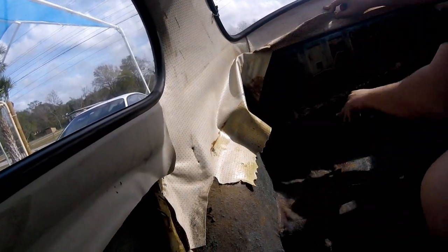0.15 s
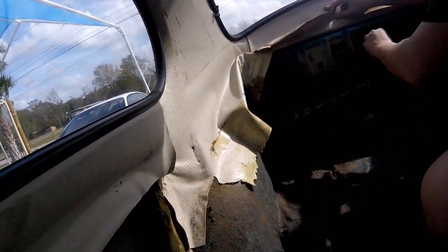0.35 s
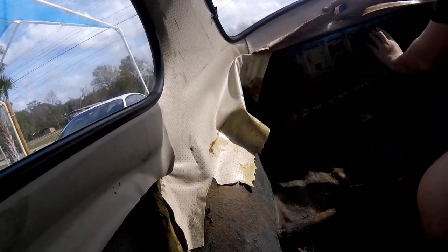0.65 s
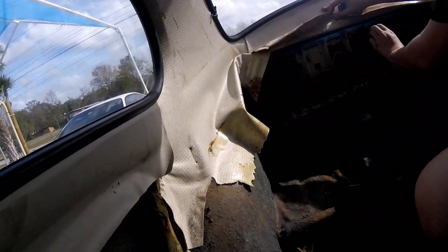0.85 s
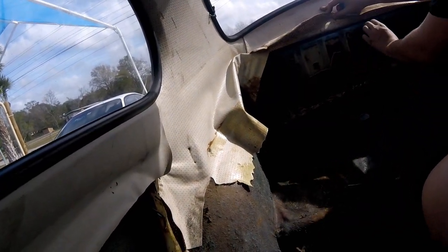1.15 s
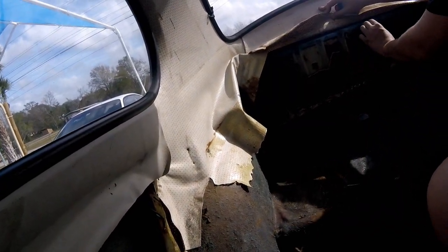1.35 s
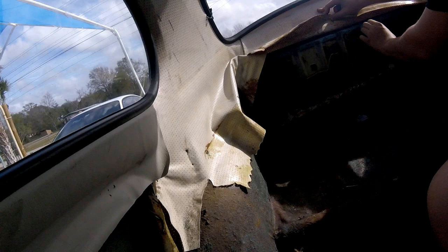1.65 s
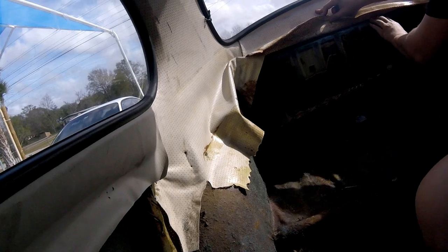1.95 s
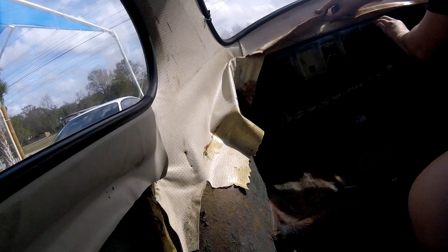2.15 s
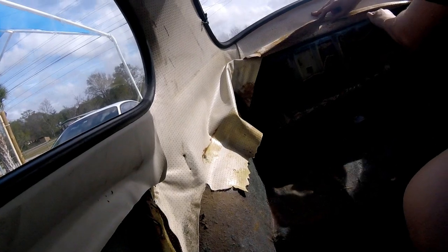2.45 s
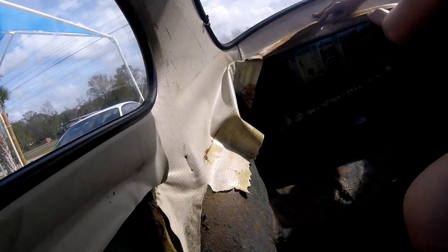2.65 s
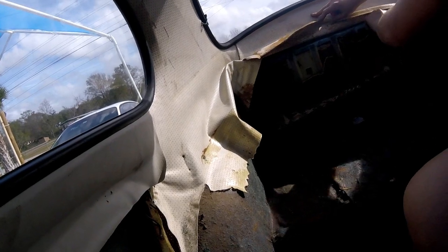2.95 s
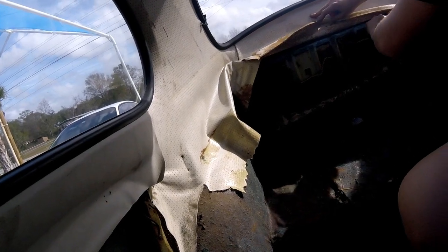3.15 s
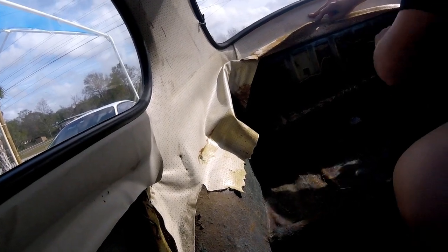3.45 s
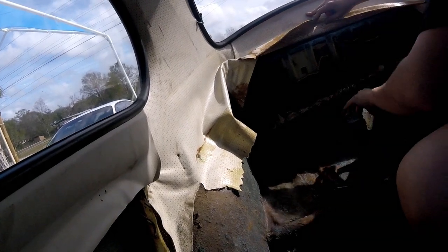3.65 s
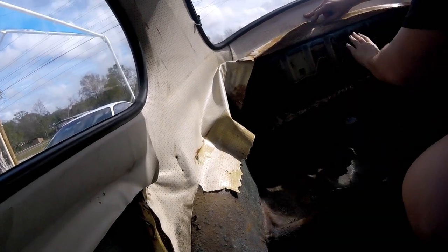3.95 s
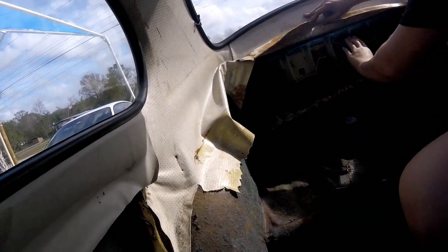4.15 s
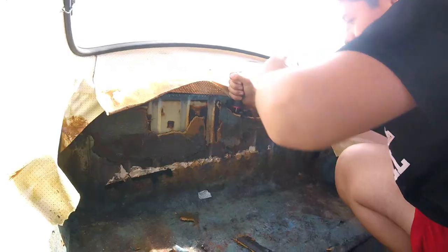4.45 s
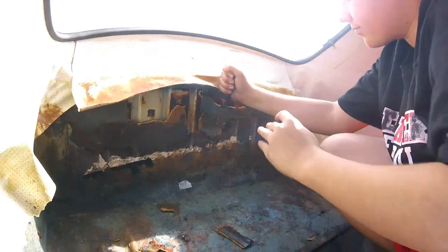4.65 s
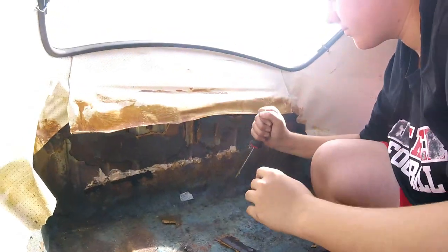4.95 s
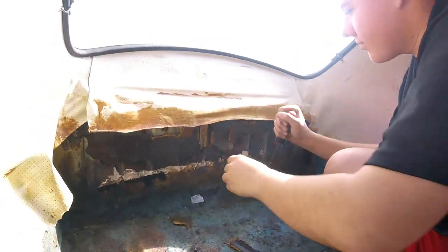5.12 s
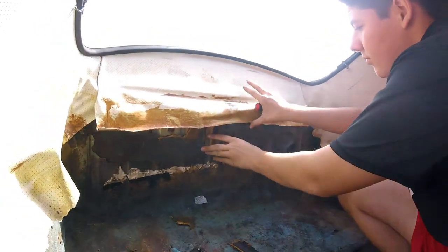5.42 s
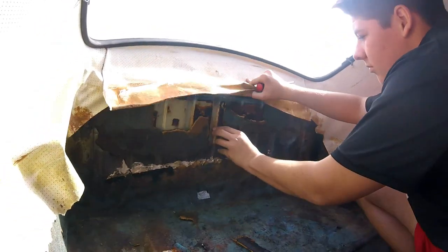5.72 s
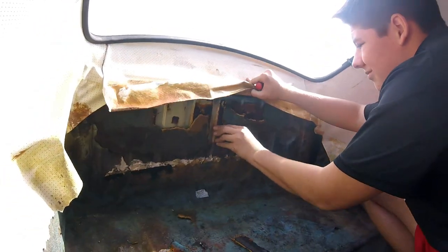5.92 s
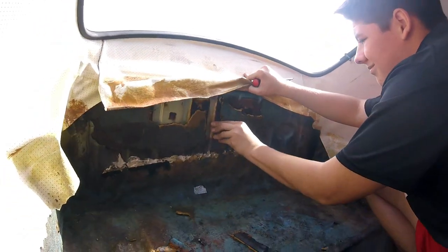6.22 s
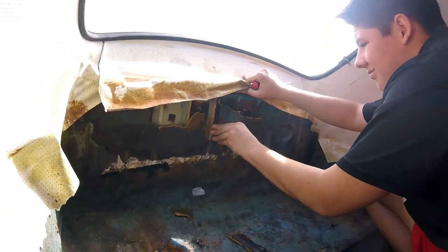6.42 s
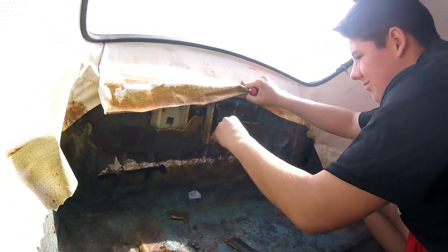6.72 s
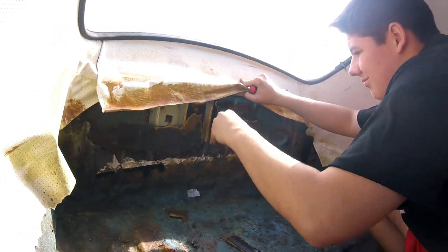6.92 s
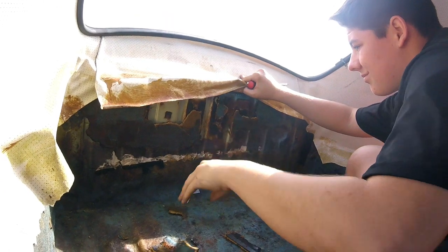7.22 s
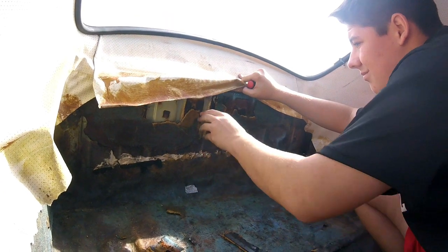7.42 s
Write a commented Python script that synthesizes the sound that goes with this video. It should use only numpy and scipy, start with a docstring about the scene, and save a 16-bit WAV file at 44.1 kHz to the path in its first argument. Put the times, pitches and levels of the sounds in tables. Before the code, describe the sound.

Irregular deep knocks on a hollow car shell mix with dry scraping, brittle glue cracks and a brief, tiny steel tool ring.

```python
"""Old backing is pried and torn off the steel panels inside a stripped car, heard from a small microphone in the cabin.
Glue and fibre snap loose in bursts of tiny cracks, and blows boom as ringing modes of the shell.
The stiff sheet scrapes as gritty noise and rasps once; a steel tool rings twice as fading sine waves.
Behind it, the shell rumbles as low, lumpy noise and a faint hiss runs throughout."""
import sys
import numpy as np
from scipy import signal
from scipy.io import wavfile
from scipy.ndimage import uniform_filter1d

SR = 44100
rng = np.random.default_rng(int(sys.argv[2]) if len(sys.argv) > 2 else 0)


def digitize_waveform(pressure):
    """Quantize a signal to 16-bit integers and store it at the path in sys.argv[1].

    Rows of a 2-D input are taken as channels; values are limited to [-1, 1].
    """
    field = np.atleast_2d(pressure).T
    bounded = np.clip(field, -1, 1)
    quanta = np.round(bounded * 32767).astype(np.int16)
    wavfile.write(sys.argv[1], SR, quanta)


N = 334322  # length in samples

# Spectrum of the steady background hiss: pitch_hz, relative_level_db (per Hz)
AIR_SPECTRUM = [(120, -33.5), (200, -6.5), (600, -4), (2100, -10.5), (3900, -16), (6000, -17), (6500, -9),
                (7000, -17), (9400, -23), (10700, -32), (11900, -28), (16000, -55)]
AIR_DB = -56

# Loudness of the shell as weight shifting in it shakes it: time_s, level_db
RUMBLE_LEVEL = [(0, -43), (2, -42), (2.4, -39), (3.2, -43), (3.4, -34), (3.7, -39.5), (4.42, -36),
                (4.48, -37.5), (5, -40), (7.4, -35), (7.58, -28)]
# Spectrum of that rumble: pitch_hz, relative_level_db (per Hz)
RUMBLE_SPECTRUM = [(12, -49), (20, -17.5), (38, 3), (87, -3), (166, -12.5), (206, -19.5), (400, -25.5),
                   (520, -67), (880, -120)]

# Modes of the steel tool as it rings: start_s, pitch_hz, level_db, undamped_60_db_fade_s
TOOL_MODES = [(2.481, 5010, -30.5, 0.093), (2.483, 5130, -25, 0.026), (2.53, 6940, -26.5, 0.066),
              (2.535, 4995, -38.5, 2.2)]
DAMPED_AFTER_S = 0.047  # a hand or the panel then damps the tool

# One dull, banded rasp as the sheet slides: start_s, end_s, level_db
RASP_STROKE = (4.464, 4.63, -45.5)
# Fixed bands of the sheet that colour the rasp: pitch_hz, relative_level_db
SHEET_BANDS = [(860, -0.5), (1320, 2.5), (2000, 1), (2400, -1), (3120, 1)]

# Strokes of the sheet dragging on steel: start_s, end_s, level_db, tilt_db (crisp above zero, dull below)
SCRAPE_STROKES = [(0.603, 0.716, -46, 2), (0.876, 1.059, -45, -2), (1.145, 1.463, -54, 5),
                  (1.69, 1.83, -53.5, -3), (2.126, 2.223, -54.5, -8.5), (2.242, 2.654, -47.5, 0.5),
                  (2.653, 2.877, -51, -0.5), (2.855, 3.27, -44.5, -1), (3.285, 3.525, -46, 1.8),
                  (3.695, 3.754, -45, 7), (3.769, 3.871, -40, -3), (3.973, 4.382, -55, 0),
                  (4.61, 4.791, -42.5, 0.5), (4.776, 5.12, -51, 8.5), (5.142, 6.106, -59.5, 1),
                  (5.525, 5.603, -54.5, -9), (5.771, 5.812, -48.5, -4), (6.092, 6.367, -46.5, 4),
                  (6.376, 6.928, -47.5, 0.3), (7.206, 7.291, -38, -1), (7.402, 7.55, -50.5, -6)]
SLIPS_PER_S = 43
CRISP_DB, DULL_DB, DULL_PER_TILT = -5, 0.46, 0.72  # dull and crisp parts, against the middle
MOST_CRACKLE, CRACKLE_GROWS_S = 0.64, 0.17  # quick swipes are smooth; long pulls break into slips

# Blows on the shell: start_s, peak_db (before the knock is added), nearest_panel_pitch_hz
SHELL_BLOWS = [(0.181, -5.5, 111), (0.279, -11.5, 117), (0.408, -17.5, 110), (0.918, -28.5, 122),
               (1.758, -31, 79), (2.248, -27, 96), (2.354, -21.5, 91), (2.415, -20, 149),
               (2.558, -30.5, 172), (2.671, -27, 99), (2.891, -25, 99), (3.339, -22.5, 87.5),
               (3.388, -20, 73.4), (3.447, -4.5, 77.4), (3.666, -25, 124), (3.787, -7.5, 102),
               (3.819, -13.5, 80), (4.039, -20, 91), (4.11, -21.5, 77), (4.181, -20, 178),
               (4.466, -19.5, 51), (4.677, -10.5, 94.6), (4.794, -8, 53.4), (4.859, -22, 56),
               (5.35, -27, 50), (5.553, -29, 79), (6.289, -25.5, 90), (6.85, -10.5, 75.6),
               (6.909, -25, 103), (7.212, -4, 121), (7.244, -12.5, 142), (7.449, -22, 164)]
# Modes of the shell before each blow varies them: pitch_hz, relative_level_db, plain_60_db_fade_s
SHELL_MODES = [(47.63, 0.5, 0.42), (59.27, 3, 0.36), (72.7, -4.5, 0.24), (90.96, 1, 0.26), (109, 1.5, 0.21),
               (137.3, -1.5, 0.24), (156.46, 3, 0.37), (185.5, -2, 0.47), (246.2, 5.5, 0.19),
               (297.4, -1, 0.28), (362.3, -2.5, 0.24), (491.3, -8.5, 0.21), (634, -7.5, 0.098),
               (759.5, -7, 0.093), (864, -8.5, 0.12), (1106, -7.5, 0.097)]
# Small, high-pitched panels are stiffer and wake more upper modes
UPPER_DB, UPPER_DB_PER_OCTAVE, PLAIN_PANEL_HZ = -9.5, 12, 100.6
# Hard blows are damped sooner by the hand behind them: fade factor of a 0 dB blow, and its growth per dB below
RING_AT_0_DB, RING_LONGER_PER_DB = 1.028, 0.017

# Glue and fibre snapping loose: start_s, peak_db (of the middle band), crisp_edge_db, freed_patch_pitch_hz
GLUE_SNAPS = [(0.1825, -17, -18, 1300), (0.2818, -32, -6.5, 1420), (0.409, -39, -11, 1390),
              (0.6549, -31, -7, 2500), (0.7362, -39, -7, 4730), (0.9185, -35, -9, 2190),
              (1.3758, -37, 13, 1450), (1.514, -39, -1, 2540), (1.7663, -38.5, -6, 2460),
              (2.3393, -39, 1, 1460), (2.357, -26, -4, 1670), (2.3964, -26, -8, 1410),
              (2.529, -37, -21, 3440), (2.6725, -32.5, 3, 1630), (2.7135, -37, 0, 1390),
              (2.8964, -21.5, -6, 1720), (2.955, -29, 0, 1600), (3.0242, -23.5, -1.5, 1670),
              (3.192, -27, -3, 1720), (3.2353, -35, -2, 5860), (3.4122, -31, -10, 2330),
              (3.6666, -11.5, -23, 2460), (3.771, -29, -2, 2700), (3.7885, -22, -2, 1430),
              (4.029, -32, 1, 3150), (4.1864, -33.5, -10, 1650), (4.5969, -35, 4, 6000),
              (4.6789, -18.5, -4, 2100), (4.791, -23.5, 3, 2400), (4.9072, -28.5, 2.5, 5500),
              (4.993, -28.5, 10, 2840), (5.048, -48, 11, 6300), (5.1002, -32, 15, 2870),
              (6.11, -35, 10, 2540), (6.188, -37.5, -3, 5640), (6.3041, -31.5, 2, 2210),
              (6.3674, -34, 0, 4420), (6.4004, -27.5, -15, 3750), (6.496, -30, 2, 4900),
              (6.558, -33, -4, 1850), (6.642, -43.5, 11, 6450), (6.7815, -31, 0, 1890),
              (6.794, -26.5, 2, 1430), (6.8521, -27.5, -3, 2950), (6.9036, -36, 0, 1610),
              (7.213, -20, -28, 1380), (7.236, -20, -3, 2400), (7.4619, -26, 1, 1830)]
# A snap torn off by a blow knocks the panel too
KNOCK_WITH_BLOW_DB, KNOCK_ALONE_DB, WITH_BLOW_S = 3.5, -9.5, 0.015

# Resonances of the panels that colour snaps and scrapes: pitch_hz, width_hz, boost_db
PANEL_RESONANCES = [(1597, 167, 1.5), (2200, 730, 2), (2560, 200, -0.5), (3360, 1300, -4.5),
                    (4800, 1500, 5.5), (6230, 890, 6)]
# Microphone response to those close sounds: pitch_hz, gain_db
MIC_RESPONSE = [(7000, 1.5), (9500, -10.5), (10500, -19.5), (13000, -29.5), (16000, -31.5)]
EDGE_HZ = 15800  # top of the final band


def amp(db):
    """Turns decibels into a plain multiplier."""
    return 10 ** (np.asarray(db) / 20)


def evened(x):
    """Scales a sound to an average (RMS) level of one."""
    return x / np.sqrt(np.mean(x ** 2) + 1e-20)


def read(points, hz):
    """Reads a curve between its points, along a logarithmic pitch scale."""
    f, value = np.transpose(points)
    return np.interp(np.log(hz + 1), np.log(f + 1), value)


def add(mix, s, sound):
    """Adds a sound to the mix at a time in seconds."""
    part = mix[round(s * SR):][:len(sound)]
    part += sound[:len(part)]


def band(x, lo_hz, hi_hz, order=3):
    """Keeps the part of a sound between two pitches."""
    return signal.sosfilt(signal.butter(order, [lo_hz, hi_hz], "bandpass", fs=SR, output="sos"), x)


def colour(x, gain_db):
    """Filters with a gain given on 1025 bins; phase worked out from the log gain makes it causal."""
    log_gain = np.log(amp(gain_db))
    circle = np.r_[log_gain, log_gain[-2:0:-1]]
    taps = np.fft.ifft(np.exp(np.conj(signal.hilbert(circle)))).real
    return signal.oaconvolve(x, taps)[:len(x)]


def hiss(shape, patchy_db, size):
    """Noise of a given spectrum whose level drifts in patches of time and pitch."""
    hz = np.fft.rfftfreq(size, 1 / SR)
    frames = N * 4 // size + 5
    real, imaginary, patches = rng.standard_normal((3, len(hz), frames))
    patches = uniform_filter1d(patches, size=9, axis=0)
    patches = evened(uniform_filter1d(patches, size=9, axis=1))
    level_db = read(shape, hz)[:, None] + patchy_db * patches
    spectrum = (real + 1j * imaginary) * amp(level_db)
    noise = signal.istft(spectrum, nperseg=size, noverlap=size * 3 // 4)[1]
    return evened(noise[:N])


def three_bands(x, dull, middle, crisp):
    """Splits a broad sound into its dull, middle and crisp parts and weighs each."""
    dull_part = dull * evened(band(x, 330, 1547))
    middle_part = middle * evened(band(x, 1460, 3670))
    crisp_part = crisp * evened(band(x, 6060, 15400))
    return dull_part + middle_part + crisp_part


def air():
    """Faint background hiss: broad noise with small drifting patches."""
    return amp(AIR_DB) * hiss(AIR_SPECTRUM, 2.2, size=512)


def rumble():
    """Weight shifting in the shell shakes it: low noise in slow lumps."""
    s, db = np.transpose(RUMBLE_LEVEL)
    level = amp(np.interp(np.arange(N) / SR, s, db))
    return level * hiss(RUMBLE_SPECTRUM, 2.85, size=4096)


def tool():
    """Modes of hard steel ring as sine waves, cut short when touched."""
    out, t = np.zeros(N), np.arange(5000) / SR
    touched = np.maximum(t - DAMPED_AFTER_S, 0)
    damped_db = -np.minimum(2500 * touched, 16 + 300 * touched)  # a fast drop, then a slower fade
    onset = 1 - np.exp(-t / 0.00057)
    for s, hz, db, fade_s in TOOL_MODES:
        level = amp(db - 60 * t / fade_s + damped_db)
        add(out, s, level * np.sin(2 * np.pi * hz * t) * onset)
    return out


def rasp():
    """Friction noise of the sliding sheet, heard through a few of its fixed bands."""
    start, end, db = RASP_STROKE
    t, out = np.arange(0, end - start, 1 / SR), np.zeros(N)
    grit = rng.standard_normal(len(t))
    bands = np.zeros(len(t))
    for k, (hz, band_db) in enumerate(SHEET_BANDS):
        sign = (-1) ** k  # neighbouring bands take opposite signs
        bands += sign * amp(band_db) * evened(band(grit, hz - 130, hz + 130, order=2))
    fade_in = np.minimum(t / 0.0023, 1)
    fade_out = np.minimum((t[-1] - t) / 0.04, 1)
    add(out, start, amp(db) * evened(bands) * fade_in * fade_out)
    return out


def scrape():
    """Grit dragged on steel: smooth in a rub, or in flurries of small slips that die in the cabin."""
    t = np.arange(N) / SR
    slip_sizes = amp(2.5 * np.minimum(rng.exponential(1, N), 4))
    slips = slip_sizes * (rng.random(N) < SLIPS_PER_S / SR)
    flurries = evened(signal.oaconvolve(slips, amp(-60 * t[:6000] / 0.049))[:N])
    grit = rng.standard_normal(N) * amp(2.0 * np.minimum(rng.exponential(1, N), 5))
    levels = np.zeros((3, N))  # dull, middle, crisp
    for start, end, db, tilt_db in SCRAPE_STROKES:
        shape = np.clip((t - start) / 0.016, 0, 1) * np.clip((end - t) / 0.04, 0, 1)
        crackle = np.clip(MOST_CRACKLE * (1 - np.exp(-(end - start) / CRACKLE_GROWS_S)), 0, 1)
        dull_db = db + DULL_DB - DULL_PER_TILT * tilt_db
        crisp_db = db + CRISP_DB + tilt_db
        parts_db = [[dull_db], [db], [crisp_db]]
        levels += amp(parts_db) * shape * (1 - crackle + crackle * flurries)
    return three_bands(grit, *levels)


def blows():
    """Each blow rings the modes near its panel most; upper modes sound stronger on higher-pitched panels."""
    out, t = np.zeros(N), np.arange(SR // 2) / SR
    mode_hz, mode_db, fade_s = (column[:, None] for column in np.transpose(SHELL_MODES))
    upper = mode_hz > 200
    for s, peak_db, panel_hz in SHELL_BLOWS:
        pitch_chance, level_chance, phase_chance, beat_chance = rng.standard_normal((4, len(SHELL_MODES), 1))
        upper_db = UPPER_DB + UPPER_DB_PER_OCTAVE * np.log2(panel_hz / PLAIN_PANEL_HZ)
        ring = RING_AT_0_DB - RING_LONGER_PER_DB * peak_db
        hz = mode_hz * (1 + 0.0345 * pitch_chance)  # each blow's modes vary a little in pitch by chance
        near = 1 / (1 + (np.log2(hz / panel_hz) / 0.42) ** 2) + 0.054

        life = t / (fade_s * ring)
        fall = amp(-60 * life) + 0.88 * amp(-200 * life)  # a strong first swing, then the ring
        swing = -np.sin(2 * np.pi * (hz * t + 0.13 * phase_chance))
        modes = amp(mode_db + 2.22 * level_chance) * fall * swing
        # close neighbours beat with each mode
        beat_hz = 0.0585 * (1 + abs(beat_chance)) * hz
        modes *= 1 + 0.63 * np.cos(2 * np.pi * beat_hz * t)
        # low-pitched panels start more slowly and wake fewer upper modes
        onset_s = 0.0021 * amp(-0.7 * upper_db)
        onset = 1 - np.exp(-t / onset_s)
        modes *= onset ** 2

        boom = (modes * near * ~upper).sum(0)
        knock = (modes * upper).sum(0)
        rattle = evened(band(rng.standard_normal(len(t)), 160, 818))
        rattle *= amp(-60 * t / (0.15 * ring)) * onset
        knock = knock / abs(knock).max() + 0.31 * rattle  # loose trim shakes with the panel
        add(out, s, amp(peak_db) * (boom / abs(boom).max() + amp(upper_db) * knock))
    return out


def snaps():
    """Bursts of tiny cracks: sharp front, the ring of the freed patch, then a tail scattered in the cabin."""
    out, t = np.zeros(N), np.arange(6000) / SR
    blow_s = np.transpose(SHELL_BLOWS)[0]
    fall = amp(-60 * t / 0.12) + 0.76 * np.exp(-t / 0.0051)
    onset = 1 - np.exp(-t / 0.00062)
    for s, peak_db, edge_db, ring_hz in GLUE_SNAPS:
        with_blow = abs(blow_s - s).min() < WITH_BLOW_S
        knock_db = KNOCK_WITH_BLOW_DB if with_blow else KNOCK_ALONE_DB
        cracks = rng.standard_normal(len(t)) * amp(2.28 * rng.exponential(1, len(t)))
        burst = three_bands(cracks, amp(knock_db), 0.83, amp(edge_db))
        patch_ring = evened(band(cracks, ring_hz / 1.053, ring_hz * 1.07, order=1))
        burst += 0.73 * burst.std() * patch_ring
        snap = burst * fall * onset
        middle_peak = abs(band(snap, 1500, 3390)).max()
        add(out, s - 0.0015, amp(peak_db) * snap / middle_peak)  # begins just ahead of the listed time
    return out


def scene():
    """Colours the close sounds by panels and microphone, then adds every other layer."""
    hz = np.fft.rfftfreq(2048, 1 / SR)
    panel_db = sum(db / (1 + (2 * (hz - f) / width) ** 2) for f, width, db in PANEL_RESONANCES)
    close = colour(snaps() + scrape(), panel_db + read(MIC_RESPONSE, hz) - 4.5)
    mix = air() + rumble() + tool() + rasp() + blows() + close
    return mix[None]


def record(dry):
    """The microphone drops the deepest bass; a steep filter then removes the highest treble."""
    thinned = signal.sosfilt(signal.butter(3, 34., "highpass", fs=SR, output="sos"), dry)
    treble_cut = signal.firwin(511, EDGE_HZ, window=("kaiser", 9), fs=SR)
    return signal.oaconvolve(thinned, treble_cut[None], "same")


dry = scene()
out = record(dry)
digitize_waveform(out)
```